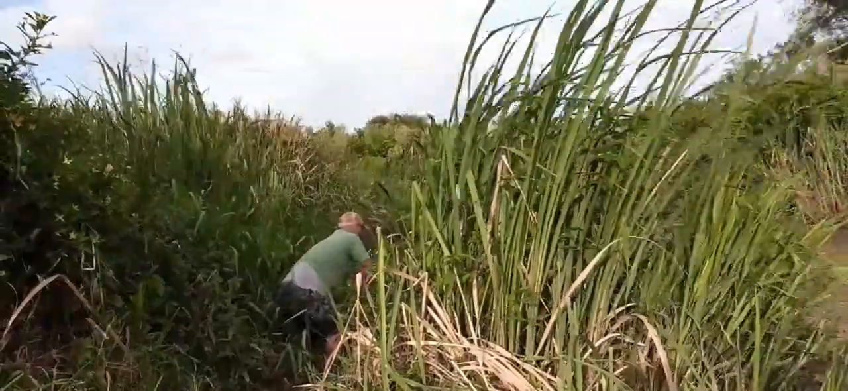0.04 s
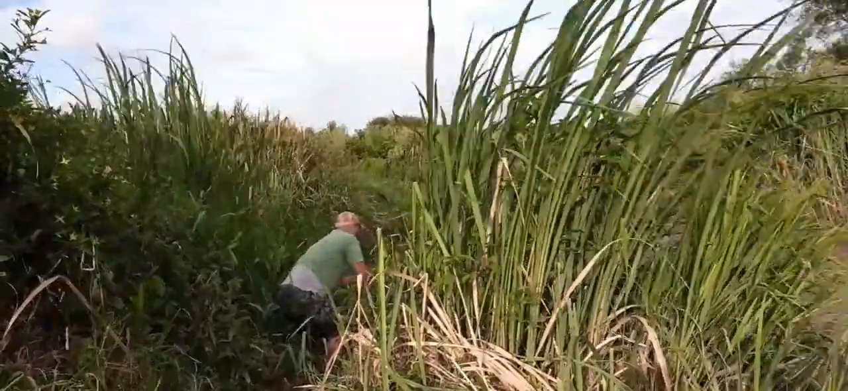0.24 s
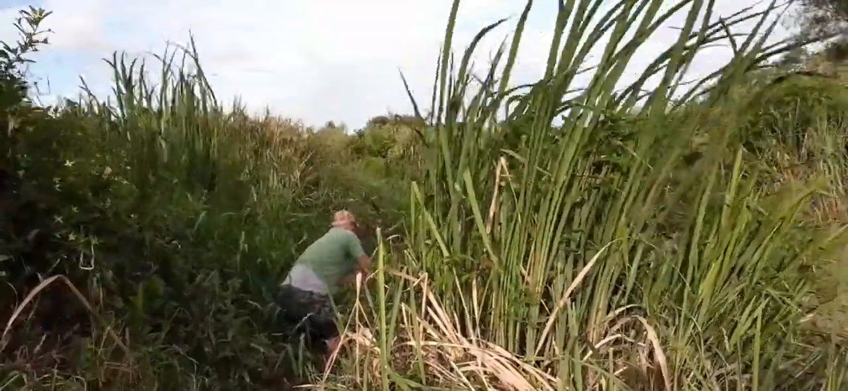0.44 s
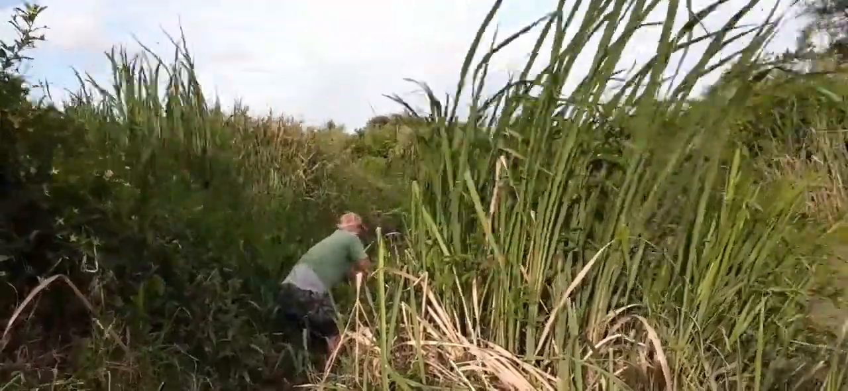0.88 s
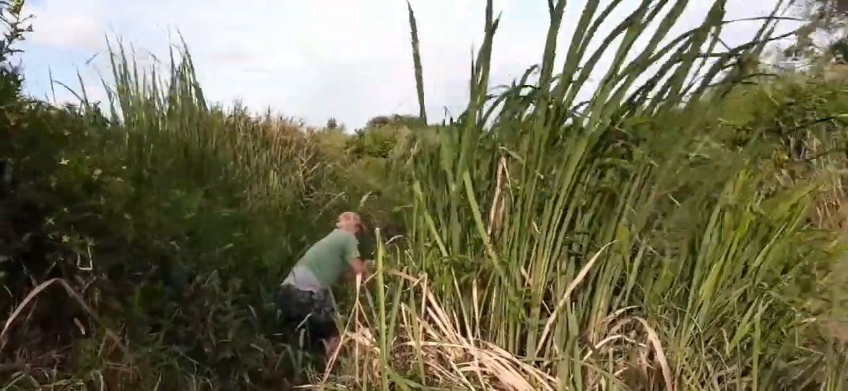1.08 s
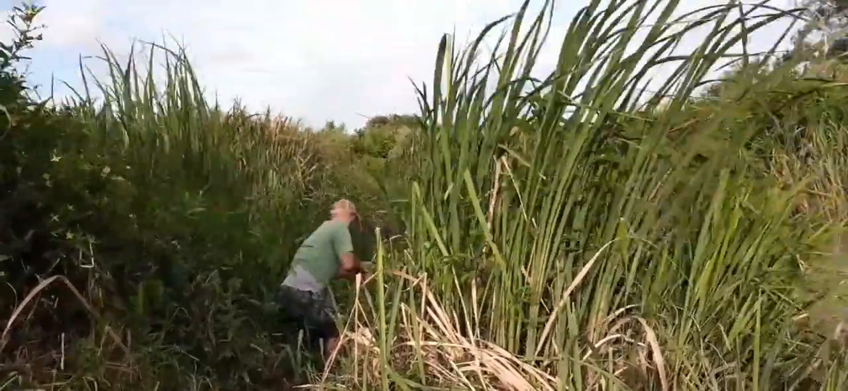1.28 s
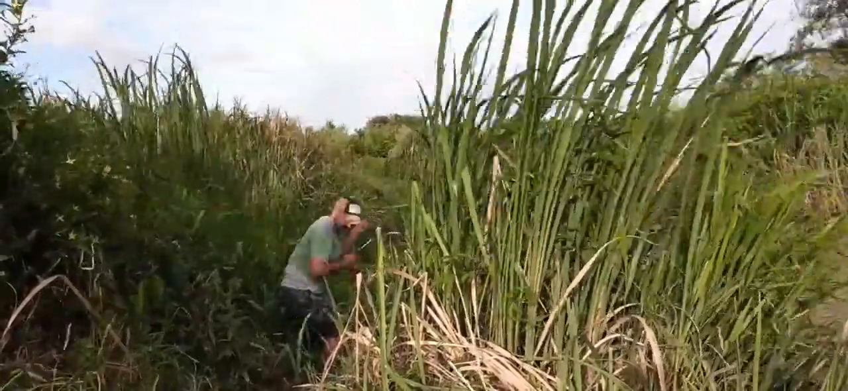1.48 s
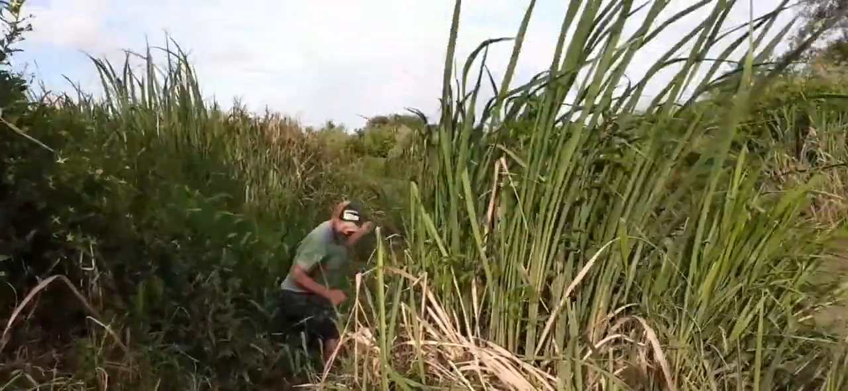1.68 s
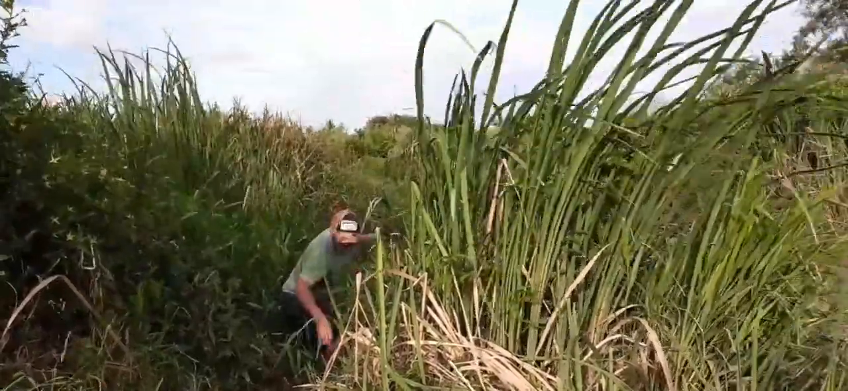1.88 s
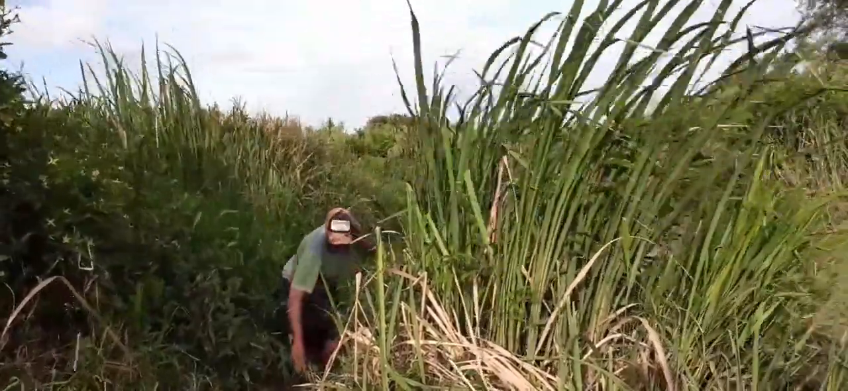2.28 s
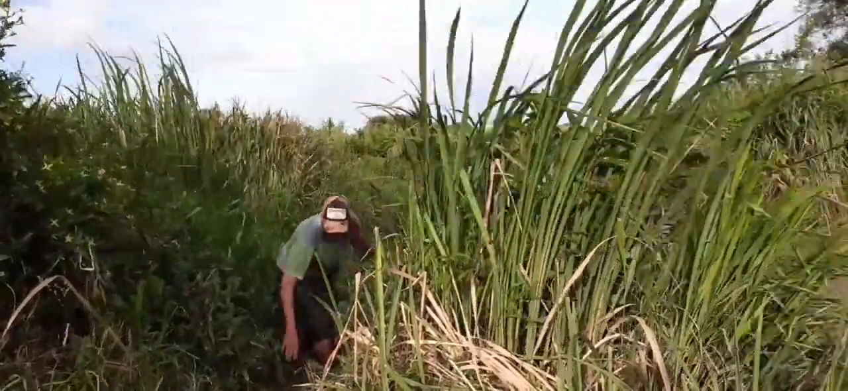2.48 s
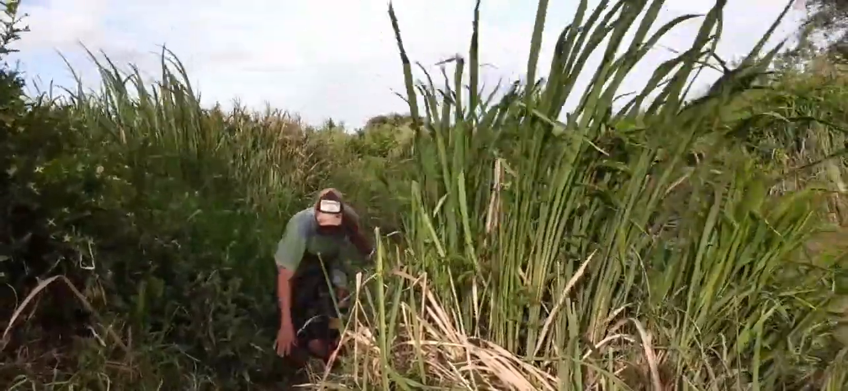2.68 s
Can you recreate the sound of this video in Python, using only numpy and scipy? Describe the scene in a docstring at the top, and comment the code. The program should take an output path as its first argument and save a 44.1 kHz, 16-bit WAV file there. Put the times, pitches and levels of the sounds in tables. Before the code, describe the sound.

Tall reeds hiss and rustle in the wind throughout, their leaves fluttering and ticking. From about 0.1 seconds, gusts buffet the microphone with an uneven low rumble. The buffeting eases around 1.5 seconds, returns strongly at 2.2 as the rustle swells, and mostly drops away after 2.4. Far behind are a faint, thin insect trill, a soft wash of bushes and a faint low roar.

```python
"""Tall reeds hiss in the wind: their leaves rub, flutter and tick against each other.
The same wind sheds eddies at two microphone ports, a rumble broken by short, brighter buffets.
Far behind lie a faint low roar, a thin insect trill of resonant pulses and a dull wash of bushes.
Halfway through, the whole sound drops out for an instant."""
import sys
import numpy as np
from scipy import signal
from scipy.fft import rfft, irfft
from scipy.io import wavfile
from scipy.ndimage import uniform_filter1d

SR = 44100
rng = np.random.default_rng(int(sys.argv[2]) if len(sys.argv) > 2 else 0)


def bounce(signal):
    """Save signal as a 16-bit WAV file at the path given by the first command-line argument."""
    frames = np.transpose(np.atleast_2d(signal))
    limited = np.clip(frames, -1, 1)
    pcm = np.round(limited * 32767).astype(np.int16)
    wavfile.write(sys.argv[1], SR, pcm)


N = 125685
TIME, HZ = np.arange(N) / SR, np.fft.rfftfreq(N, 1 / SR)

# Spectrum of the leaves: f/Hz, relative level/dB
LEAF_SPECTRUM = [(40, -48), (150, -21), (400, -7.5), (800, -2.5), (1400, -4.5), (2200, 0.35), (3500, -1.2),
                 (4200, 0), (4900, -0.6), (5600, -0.5), (6100, -2.5), (6400, -4.5), (7300, -6), (8500, -11),
                 (10200, -7.5), (11000, -7.5), (11800, -4), (13500, -6.5), (15500, -6.5)]
# Swell of the reeds in the wind: t/s, relative level/dB
REED_SWELL = [(0, -47.5), (.13, -43.5), (.19, -48.5), (.26, -46), (.345, -49.5), (.39, -46.5), (.5, -47),
              (.71, -47.5), (.75, -51.5), (.81, -49.5), (.87, -52), (.95, -50.5), (1.02, -48), (1.055, -53),
              (1.095, -49.5), (1.15, -56), (1.22, -51), (1.25, -49), (1.28, -46), (1.31, -55),
              (1.35, -47.5), (1.43, -50.5), (1.56, -47), (1.61, -49.3), (1.7, -51.5), (1.82, -48),
              (2.0, -48), (2.15, -46.5), (2.2, -44), (2.255, -46), (2.3, -42), (2.38, -48), (2.47, -46),
              (2.54, -48.5), (2.6, -46.5), (2.69, -48), (2.78, -50.5), (2.85, -48.5)]
# Brightness of the reeds: t/s, treble gain/dB
REED_TREBLE = [(0, -0.5), (.3, 0), (.65, 2.5), (1.2, 1), (1.28, 1), (1.36, 1), (1.9, 1.6), (2.3, 2.5),
               (2.6, 4), (2.85, 2)]
# Depth of the leaf flutter: t/s, rms depth/dB
FLUTTER_DEPTH = [(0, 0.85), (.7, 1.46), (1.1, 1), (1.45, 0.8), (1.6, 0.63), (2.85, 0.5)]
# Likeness of the foliage at the two ears: f/Hz, coherence
FOLIAGE_COHERENCE = [(300, 1), (1000, 0.14), (2600, 0.13), (4200, 0.27), (7000, 0.034), (15000, 0.041)]
# Air flow over the ports: t/s, left level/dB, right level/dB
PORT_FLOW = [(0, -73, -63), (.04, -72, -61.5), (.08, -56.5, -46), (.19, -48, -38.5), (.33, -42.5, -51),
             (.6, -45.5, -43), (.8, -46.5, -39), (.89, -53.5, -47), (.97, -43.5, -42.5),
             (1.1, -41.5, -43.5), (1.28, -50.5, -48.5), (1.42, -50, -51), (1.6, -52.5, -54.5),
             (1.72, -68, -54.5), (1.88, -54.5, -52), (1.99, -47, -49), (2.08, -47.5, -44), (2.2, -44, -35),
             (2.34, -41, -39), (2.4, -60, -62), (2.52, -77, -77), (2.69, -83, -75), (2.735, -70, -53.5),
             (2.85, -77, -54)]
# Buffets: peak t/s, half length/s, rumble level/dB, burble level/dB, left over right/dB,
# likeness of the ports (below 0 they push in opposition)
PORT_BUFFETS = [(0.147, 0.0084, -38, -54, 6, -0.53), (0.222, .016, -46, -30.5, -7.5, -0.23),
                (0.256, 0.021, -27.5, -34, 0, 0.28), (0.285, 0.016, -32.5, -33.5, -2.5, 0.65),
                (0.326, 0.014, -53.5, -39, 2, .3), (0.389, 0.0054, -33, -60, -8, 1),
                (0.422, .01, -35.5, -44.5, 3, -0.44), (0.48, 0.012, -35.5, -60, -5, 0.78),
                (0.496, 0.0066, -32.5, -35, 9.5, 0.28), (0.528, 0.013, -37, -33.5, -8.5, 0.13),
                (0.56, 0.0097, -35, -50, -9.5, -0.81), (0.627, 0.01, -34.5, -41.5, 4, 0.23),
                (0.668, .011, -37, -47.5, 10, 0.2), (0.708, 0.0064, -37, -59, -2, 0.071),
                (0.783, 0.0075, -35, -48, 9, 0.55), (0.84, 0.015, -34, -35, 0, 0.042),
                (0.959, 0.008, -38, -45, -3, -0.42), (1.006, 0.016, -33.5, -47, -4, 0.5),
                (1.091, 0.011, -35.5, -40, -1, 0.23), (1.159, 0.0077, -34, -28.5, -4.5, -0.23),
                (1.181, 0.012, -35.5, -29, -1.5, -0.17), (1.226, 0.013, -32.5, -39.5, -4, -0.2),
                (1.262, 0.0071, -49, -35, -1, -0.17), (1.327, 0.0082, -34.5, -37.5, 8, -0.23),
                (1.367, 0.02, -37, -54, 4.5, 0.2), (1.654, 0.012, -40, -62, 2.5, -.95),
                (1.971, 0.0074, -34, -48.5, 5, -0.76), (2.183, 0.01, -40, -37, -2, 0),
                (2.222, 0.0071, -27, -35, 2.5, -1.02), (2.242, 0.0064, -38, -27.5, -1.5, 0.057),
                (2.284, 0.019, -36, -30.5, 3.5, 0.11), (2.341, 0.0087, -50, -36.5, 0, -0.15),
                (2.804, 0.0074, -44, -51, -17, -0.11)]
# Spectrum of the low rumble at the ports: f/Hz, relative level/dB
RUMBLE_SPECTRUM = [(10, -27), (25, -16), (45, -7), (75, 0.5), (125, 0.5), (200, -8), (320, -17), (480, -45),
                   (700, -50), (1500, -52)]
# Spectrum of the brighter burble at the ports: f/Hz, relative level/dB
BURBLE_SPECTRUM = [(60, -19.5), (160, -5), (240, -0.5), (330, 2.5), (440, -2.5), (540, -12.5), (700, -21),
                   (1000, -39), (2000, -38.5)]
# Spectrum of the far roar: f/Hz, relative level/dB
ROAR_SPECTRUM = [(20, -44), (100, -75), (220, -25), (310, -0.5), (390, 2.5), (480, -0.5), (620, -3.5),
                 (900, -7), (1500, -22.5), (4000, -41)]
# Swell of the insects' direct trill: t/s, level/dB
TRILL_SWELL = [(0, -67), (.7, -65.5), (1.2, -62), (1.65, -63.5), (1.8, -57), (2.0, -60), (2.15, -63),
               (2.5, -57.5), (2.85, -69)]
# Swell of the bushes: t/s, level/dB
BUSH_SWELL = [(0, -93), (.6, -55), (1.1, -54), (1.6, -58.5), (2.0, -53), (2.3, -47), (2.5, -52),
              (2.85, -53.5)]
# Spectrum of the bushes: f/Hz, relative level/dB
BUSH_SPECTRUM = [(200, -16), (500, -3.5), (850, -4), (1400, -0.5), (2000, -8.5), (3000, -7.5), (6000, -21),
                 (15000, -31)]
# Brief dip of the whole sound: t/s, gain/dB
DROPOUT_GAIN = [(1.5158, 0), (1.5168, -22), (1.5238, -21), (1.5245, -6), (1.527, -7), (1.5285, 0)]


def amp(db):
    """The decibel law: 20 dB is a tenfold amplitude."""
    return 10 ** (np.asarray(db) / 20)


def unit(x):
    """Normalisation to rms 1."""
    return x / np.sqrt(np.mean(x ** 2) + 1e-20)


def curve(rows, column=1):
    """Linear interpolation of a time table at every sample."""
    rows = np.array(rows, float)
    return np.interp(TIME, rows[:, 0], rows[:, column])


def over_frequency(rows):
    """Interpolation of a frequency table on a logarithmic axis."""
    hz, values = np.transpose(rows)
    return np.interp(np.log(HZ + 1), np.log(hz), values)


def colour(x, spectrum):
    """Spectral shaping by a table, to rms 1."""
    return unit(irfft(rfft(x) * amp(over_frequency(spectrum)), N))


def lowpass(x, hz):
    """Zero-phase low-pass filtering, 6 dB down at hz."""
    return irfft(rfft(x) / (1 + (HZ / hz) ** 4), N)


def noise(channels=2):
    """Gaussian white noise, independent in each channel."""
    return rng.standard_normal((channels, N))


def wander(rate_hz, channels=1):
    """Slow random modulation: low-passed noise of rms 1."""
    return unit(lowpass(noise(channels), rate_hz))


def correlated_noise(likeness):
    """Partial correlation: two noises share a part set by their likeness."""
    left, other = noise()
    share = np.clip(likeness, -1, 1)
    return np.array([left, share * left + np.sqrt(1 - share ** 2) * other])


def from_right(x, lag_s=.00048):
    """Interaural delay: a share of the sound from the right reaches the left ear late."""
    share = np.clip(over_frequency(FOLIAGE_COHERENCE), 0, 1)
    left, right = rfft(x)
    late = right * np.exp(-2j * np.pi * HZ * lag_s)
    return irfft(np.array([share * late + np.sqrt(1 - share ** 2) * left, right]), N)


def leaf_clumps(x, depth_db):
    """Narrow-band modulation: clumps of leaves come and go, each in its own band."""
    spectra = signal.stft(x, nperseg=1024)[2]
    swell = uniform_filter1d(rng.standard_normal(spectra.shape[1:]), size=8, axis=0)  # across bands
    swell = uniform_filter1d(swell, size=10, axis=1)  # along time
    return unit(signal.istft(spectra * amp(depth_db * unit(swell)), nperseg=1024)[1][:, :N])


def flutter_db(rates_hz=(42.94, 26.55), drift=0.061):
    """Amplitude modulation by fluttering leaves: two unsteady tremors and a random part."""
    rates = [hz * (1 + drift * wander(rate_hz=7.0)[0]) for hz in rates_hz]
    fast, slow = np.sin(2 * np.pi * np.cumsum(rates, axis=1) / SR)
    return curve(FLUTTER_DEPTH) * unit(fast + .8 * slow + .4 * wander(rate_hz=60))


def reeds(ticks_per_s=1500, hiss_db=13.5, ticks_db=-1.5, gain_db=3.5, right_gain_db=0.46):
    """Friction and impact: countless leaves rub into a hiss, and nearer ones tick."""
    tick_size = amp(5.5 * np.minimum(rng.exponential(1, (2, N)), 4))
    ticks = unit(noise() * tick_size * (rng.random((2, N)) < ticks_per_s / SR))
    contacts = amp(hiss_db) * noise() + amp(ticks_db) * ticks  # sets their balance only
    leaves = leaf_clumps(from_right(colour(contacts, LEAF_SPECTRUM)), depth_db=1.55)
    treble = leaves - lowpass(leaves, hz=7000)
    leaves = leaves + treble * (amp(curve(REED_TREBLE)) - 1)
    return leaves * amp(curve(REED_SWELL) + gain_db + flutter_db()) * amp([[0], [right_gain_db]])


def eddies(likeness, spectrum):
    """Turbulent pressure swings at the two ports, each about as strong as the next."""
    pressure = colour(correlated_noise(likeness), spectrum)
    local_power = abs(lowpass(pressure ** 2, hz=34.6))
    return unit(pressure / np.sqrt(local_power + .5))


def port_wind(rumble_lumps_db=4, burble_lumps_db=6.5, flow_burble_db=-11):
    """Turbulence at the ports: flow and buffets add in power, as a rumble and a brighter burble."""
    flow = amp([curve(PORT_FLOW), curve(PORT_FLOW, column=2)])
    rumble_power = (flow * amp(rumble_lumps_db * wander(rate_hz=52, channels=2))) ** 2
    burble_power = (flow * amp(flow_burble_db + burble_lumps_db * wander(rate_hz=24))) ** 2
    cross_power = 0
    for peak_s, half_s, rumble_db, burble_db, left_db, alike in PORT_BUFFETS:
        shove = np.exp(-((TIME - peak_s) / half_s) ** 4)
        sides = unit(amp([[left_db], [0]])) ** 2
        rumble_power += shove * sides * amp(rumble_db) ** 2
        burble_power += shove * sides * amp(burble_db) ** 2
        cross_power += shove * alike * (amp(rumble_db) ** 2 + amp(burble_db) ** 2)
    likeness = cross_power / (rumble_power + burble_power).mean(0)
    rumble = np.sqrt(rumble_power) * eddies(likeness, RUMBLE_SPECTRUM)
    burble = np.sqrt(burble_power) * eddies(likeness, BURBLE_SPECTRUM)
    return rumble + burble


def far_roar(level_db=-57):
    """Stationary noise: a faint low roar, strongly correlated between the ears."""
    return amp(level_db) * colour(correlated_noise(likeness=0.82), ROAR_SPECTRUM)


def insects(pitch_hz=5958, strokes_per_s=65.3, rise_s=0.0022, haze_width_hz=94, haze_gain_db=-4):
    """Resonance and scattering: each wing stroke rings one note, which foliage spreads into a haze."""
    strokes = np.diff(np.floor(TIME * strokes_per_s), prepend=0)
    strokes = strokes * amp(2.5 * noise(1)[0])  # uneven strength
    strokes = strokes * np.exp(2j * np.pi * rng.random(N))  # random phase
    t = TIME[:2000]
    age = t / rise_s
    ring = age ** 2 * np.exp(-2 * age) * np.exp(2j * np.pi * pitch_hz * t)
    trill = unit(signal.fftconvolve(strokes, ring)[:N].real)
    detuning = (HZ - pitch_hz) / (haze_width_hz / 2)
    haze = unit(irfft(rfft(noise()) / (1 + detuning ** 2), N))
    return amp(curve(TRILL_SWELL)) * (trill + amp(haze_gain_db) * haze)


def bushes():
    """Friction noise of distant foliage: duller, slow to swell, without flutter."""
    wash = from_right(colour(noise(), BUSH_SPECTRUM))
    return amp(curve(BUSH_SWELL)) * leaf_clumps(wash, depth_db=2.5)


def scene():
    """Superposition: the pressures of foliage, port wind and distant sources add."""
    return reeds() + bushes() + port_wind() + insects() + far_roar()


def record(dry):
    """Attenuation and band limiting: the level dips briefly, and a low-pass cuts the top treble."""
    band_limit = signal.firwin(801, cutoff=15800, window=("kaiser", 8), fs=SR)
    return signal.oaconvolve(dry * amp(curve(DROPOUT_GAIN)), band_limit[None], "same")


dry = scene()
out = record(dry)
bounce(out)
```